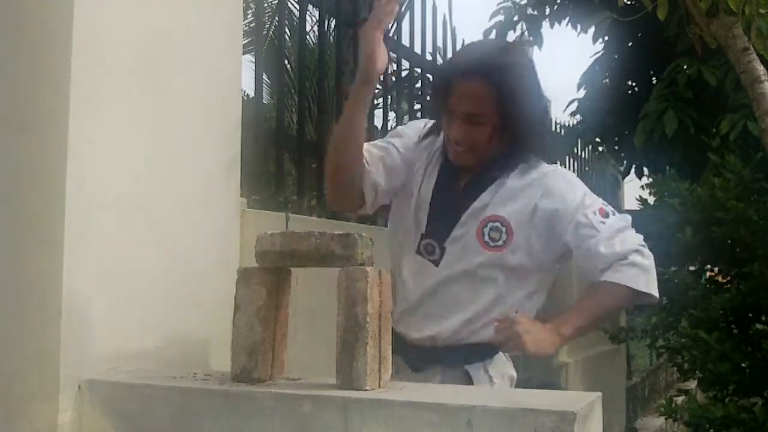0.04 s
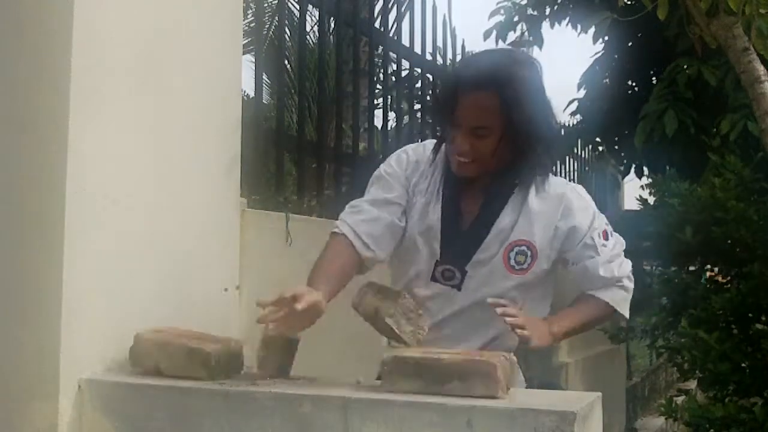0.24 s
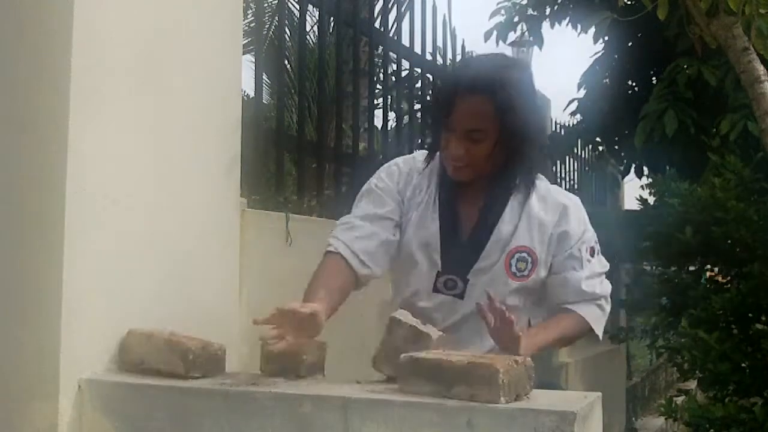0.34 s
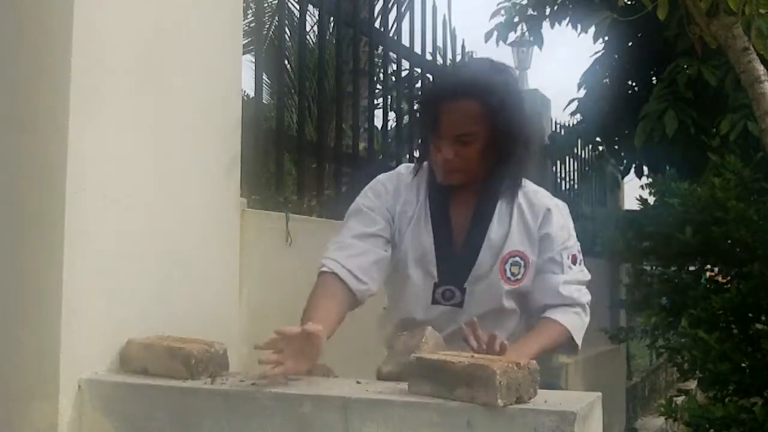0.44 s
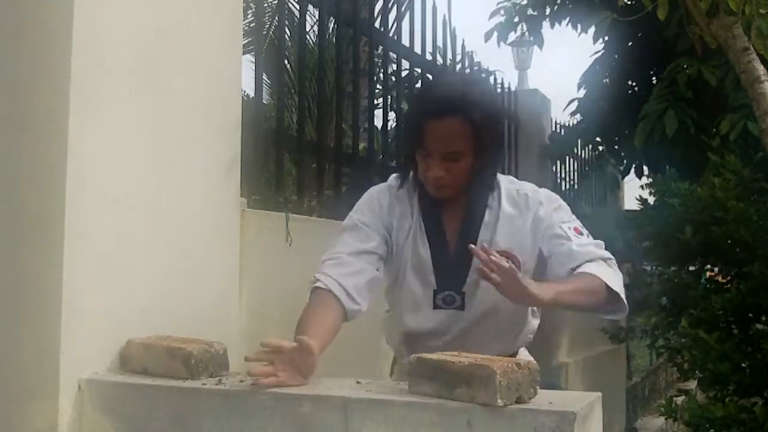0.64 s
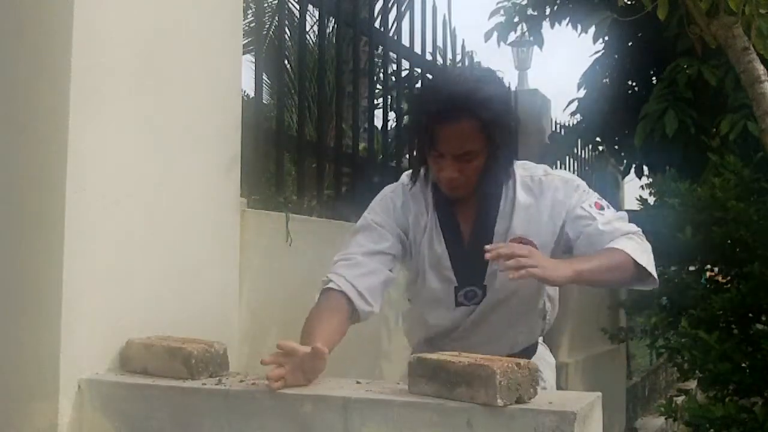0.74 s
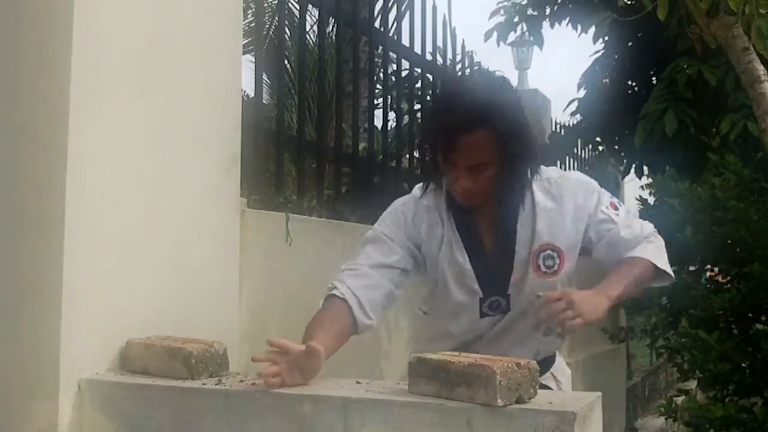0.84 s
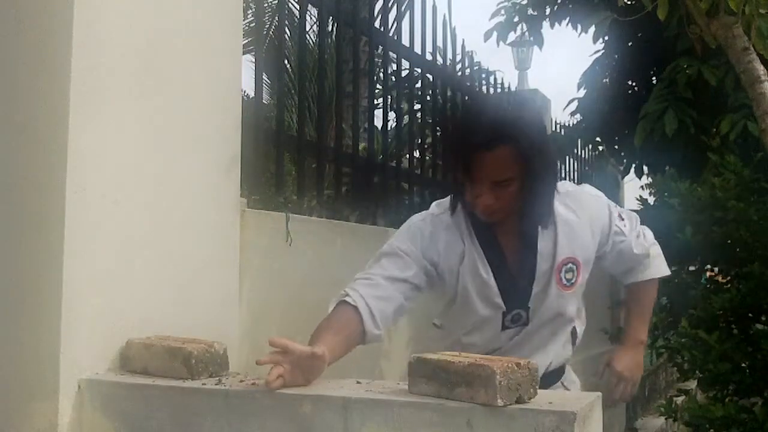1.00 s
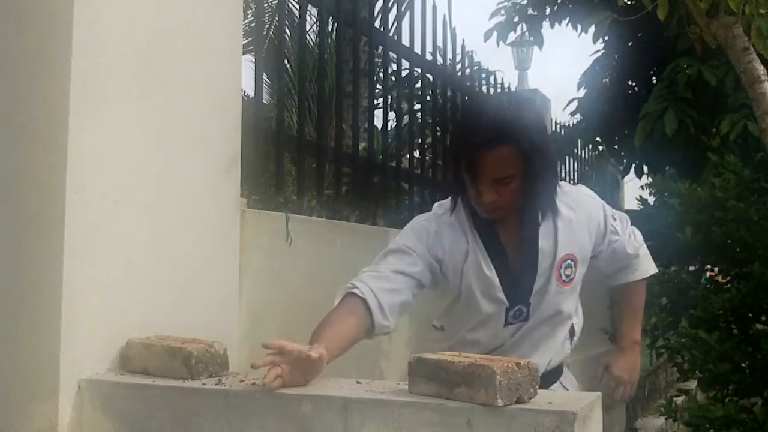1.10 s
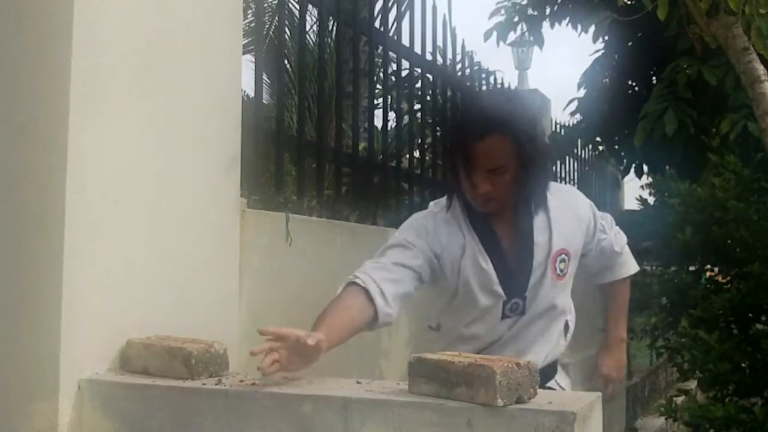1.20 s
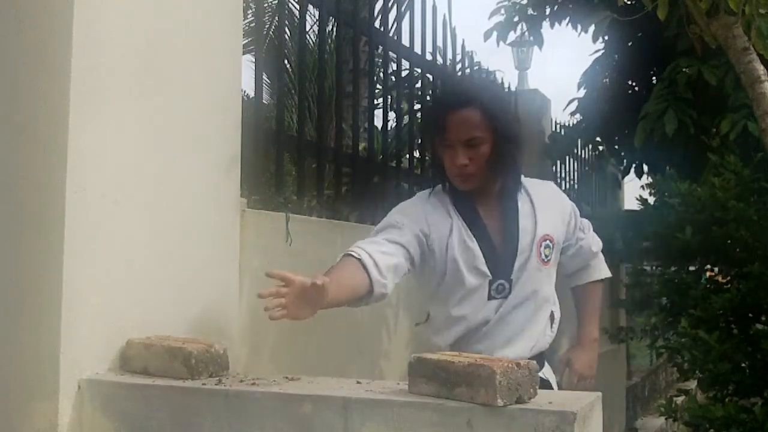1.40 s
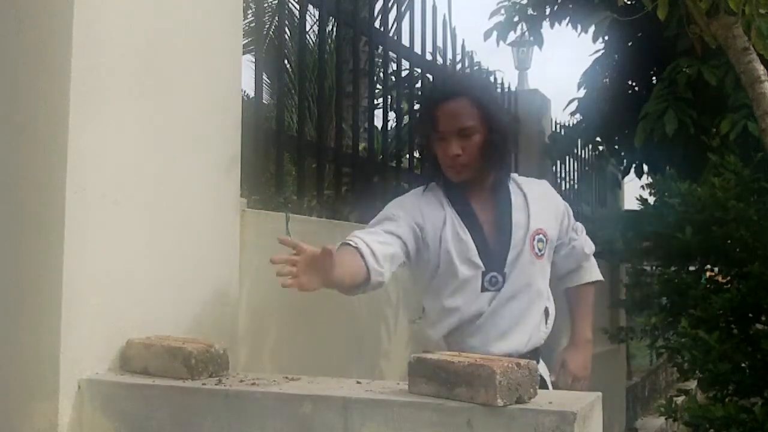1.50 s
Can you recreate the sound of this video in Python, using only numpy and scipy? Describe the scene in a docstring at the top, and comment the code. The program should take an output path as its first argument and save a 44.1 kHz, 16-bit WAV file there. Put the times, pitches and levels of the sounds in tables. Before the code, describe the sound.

A hand chops through a brick with a sharp crack, pieces clattering and tumbling down outdoors

```python
"""Brick chopped in half outdoors

A hand chops through a brick laid across two upright bricks on a ledge: noise bursts over damped low modes.
Pieces clink and one brick slams flat, as ringing modes that overload the microphone; sparse grains make grit.
Pieces thud and tumble on the ground as coloured bursts, one setting metal ringing; cloth rustles in swelling noise.
Thin chirps sound faintly, and nearby walls answer by convolution over a noise bed of low rumble and still air."""
import sys
import numpy as np
from scipy import signal
from scipy.fft import rfft, irfft, next_fast_len
from scipy.io import wavfile
from scipy.ndimage import uniform_filter1d

SR = 44100
rng = np.random.default_rng(int(sys.argv[2]) if len(sys.argv) > 2 else 0)


def persist_wave(psi):
    """Save psi, clipped to +-1, as 16-bit WAV."""
    counts = np.round(np.clip(psi, -1, 1) * 32767).astype(np.int16)
    wavfile.write(sys.argv[1], SR, np.atleast_2d(counts).T)


N = 68355  # samples in the scene
T = np.arange(SR // 2) / SR  # clock of one event, seconds
SCENE_T = np.arange(N) / SR  # clock of the whole scene, seconds


def amp(db):
    """Decibels to gain."""
    return 10 ** (np.asarray(db) / 20)


def unit(x):
    """Scale to rms 1."""
    return x / np.sqrt(np.mean(x ** 2) + 1e-20)


def along(points, hz):
    """Read (Hz, value) points at any frequency, on a log axis."""
    f, v = np.transpose(points)
    return np.interp(np.log(hz + 1), np.log(f + 1), v)


def fader(points):
    """Gain over the scene from (s, dB) points."""
    return amp(np.interp(SCENE_T, *np.transpose(points)))


def noise(size):
    """White noise."""
    return rng.standard_normal(size)


def coloured(x, colour):
    """Shape x with a spectrum, at rms 1."""
    gain = amp(along(colour, np.fft.rfftfreq(len(x), 1 / SR)))
    return unit(irfft(rfft(x) * gain, len(x)))


def add(out, s, x):
    """Mix x into out at time s."""
    i = max(0, round(s * SR))
    out[i:i + len(x)] += x[:max(0, len(out) - i)]


def burst(colour, attack, t60):
    """The noise of one contact: a quick rise and a decay (seconds), with the same energy on every draw."""
    shape = (1 - np.exp(-T / attack)) * amp(-60 * T / t60)
    x = shape * coloured(noise(len(T)), colour)
    return x * np.linalg.norm(shape) / np.linalg.norm(x)


def ring(modes, attack, blur):
    """Damped modes whose phases drift (blur in radians per root second), as in a rough body."""
    drifts = blur * np.cumsum(noise((len(modes), len(T))), axis=1) / np.sqrt(SR)
    tones = np.zeros(len(T))
    for (hz, db, t60), drift in zip(modes, drifts):
        decay = amp(db + rng.normal() - 60 * T / t60)  # each strike weights the modes a little differently
        tones += decay * np.sin(2 * np.pi * hz * T + drift)
    return tones * (1 - np.exp(-T / attack))


# stone contacts on the ledge: start_s, thud_db, knock_db, crack_db, length_factor
STONE_BLOWS = [(0.1442, -5, -17.5, -10.5, 0.96), (.1867, -25.5, -28.5, -20.5, 1.4),
               (0.235, -33, -52.5, -33, 1.3), (0.2697, -27, -37.5, -28, 1.6), (0.2733, -23, -33.5, -29, 1),
               (0.3199, -10, -6.5, -7.5, 0.96), (.3345, -12, -0.5, -17, 0.65),
               (0.3411, -10.5, -9.5, -15, 0.56), (0.404, -30, -41, -25, 0.32),
               (0.4181, -23, -31, -25.5, 1.48), (.431, -26.5, -26.5, -40, 0.63),
               (0.4407, -19, -15.5, -41.5, 0.42), (0.4624, -20, -24.5, -22.5, .45),
               (0.4772, -24.5, -38, -25.5, 0.71), (0.4985, -27.5, -46, -34.5, 1.02),
               (0.5206, -33.5, -36.5, -46, 0.68)]
# the ledge's low ring: pitch_hz, level_db, t60_s
LEDGE_MODES = [(101.5, -11, 0.47), (224, -13.5, .06), (288, 1, 0.066), (357.7, 2, 0.057)]
# spectrum of the ledge's thump: frequency_hz, level_db
THUD_COLOUR = [(25, -38), (50, -21), (100, -15), (200, 11), (340, -2), (520, -12), (1000, -45.5),
               (2500, -63.5)]
# spectrum of the brick's knock: frequency_hz, level_db
KNOCK_COLOUR = [(150, -20.5), (400, -2.5), (550, -9), (730, 3), (1000, -9), (1400, -10.5), (1800, -22.5),
                (2600, -12.5), (5000, -49.5), (12000, -59.5)]
# bright spectrum of cracking brick, shared with the grit: frequency_hz, level_db
CRACK_COLOUR = [(600, -27.5), (1250, 14), (1750, -8.5), (2250, 4.5), (2900, 3), (4300, -1.5), (6500, 2.5),
                (10000, -3.5), (13000, -9), (16000, -17.5)]


def blows():
    """Every contact cracks, knocks the brick and thumps the ledge into a short low ring."""
    out = np.zeros(N)
    for s, thud_db, knock_db, crack_db, length in STONE_BLOWS:
        thump = amp(-4) * burst(THUD_COLOUR, attack=0.001, t60=0.05 * length)
        thump = thump + amp(-6.5) * ring(LEDGE_MODES, attack=0.0005, blur=6.9)
        knock = burst(KNOCK_COLOUR, attack=0.00067, t60=0.063 * length)
        crack = burst(CRACK_COLOUR, attack=0.00042, t60=0.031 * length)
        add(out, s, amp(thud_db) * thump + amp(knock_db) * knock + amp(crack_db) * crack)
    return out


# a whole brick landing hard enough to ring: start_s, level_db
BRICK_SLAMS = [(.3005, -32), (.3192, 2.5), (.329, -13.5), (0.8547, -24), (.88, -30.5), (1.541, -39)]
# the whole brick's modes: pitch_hz, level_db, t60_s
BRICK_MODES = [(394, -19, .08), (484, -17.5, 0.11), (646, -11.5, .08), (711, -16, 0.059),
               (786.7, -8.5, 0.11), (992, -20.5, 0.14), (1166, -8, 0.076), (1349.5, 3.5, 0.041),
               (1513, -19, 0.04), (1548, -12.5, 0.044)]


def slams():
    """A whole brick lands flat and rings in its low, quickly damped modes."""
    out = np.zeros(N)
    for s, db in BRICK_SLAMS:
        add(out, s, amp(db) * ring(BRICK_MODES, attack=0.00043, blur=9.2))
    return out


# brick pieces ringing against each other: start_s, level_db, pitch_hz, overtone_db
PIECE_CLINKS = [(0.1876, -9.5, 3133, -9), (0.24, -44.5, 3110, 9.5), (0.2722, -10.5, 2776, -34),
                (0.271, -19, 3270, -18.5), (0.319, 1.5, 3073, -26), (0.327, -5.5, 3856, -33),
                (0.326, -9, 2940, -23.5), (0.341, -14.5, 2580, -22.5), (0.348, -9.5, 3180, -22.5),
                (.427, -27.5, 3170, -16), (.464, -30.5, 2700, -9), (0.4772, -20, 3113, -13)]
OVERTONE_RATIO, CLINK_T60_S = 1.651, 0.04


def clinks():
    """Small pieces ring high, each with one inharmonic overtone."""
    out = np.zeros(N)
    for s, db, hz, overtone_db in PIECE_CLINKS:
        modes = [(hz, 0, CLINK_T60_S), (hz * OVERTONE_RATIO, overtone_db, CLINK_T60_S)]
        add(out, s, amp(db) * ring(modes, attack=0.0004, blur=13))
    return out


# pieces landing and tumbling on the ground: start_s, thud_db, knock_db, dirt_db, length_factor, pitch_hz
GROUND_LANDINGS = [(.8525, -19.5, -18, -34, 1.13, 683), (.885, -28.5, -34, -47.5, 2, 750),
                   (0.9952, -17.5, -14.5, -30.5, 0.67, 485), (1.008, -45.5, -26, -39, 1.73, 426),
                   (1.021, -23.5, -48, -57, 1.27, 495), (1.092, -32.5, -34, -56.5, .7, 422),
                   (1.1741, -36.5, -35, -60, 0.93, 560), (1.224, -31, -33.5, -50, 0.94, 690),
                   (1.2643, -29.5, -25.5, -69, 0.88, 460), (1.271, -31.5, -25.5, -76, 1.33, 430),
                   (1.296, -27, -23.5, -63, 1.05, 371), (1.319, -27.5, -32, -55, 1.58, 330),
                   (1.541, -28.5, -34, -47.5, 1.3, 700)]
# spectrum of a landing knock: ratio_to_pitch, level_db
LANDING_KNOCK_COLOUR = [(.25, -56), (.6, -6), (.87, 1), (1.1, -1.5), (1.4, -14), (1.9, -12), (2.4, -24.5),
                        (3.5, -28), (6, -73), (20, -85)]
# dull spectrum of the ground: frequency_hz, level_db
EARTH_COLOUR = [(25, -36), (45, -40), (70, 2.5), (135, -0.5), (220, -2), (330, -23), (600, -28),
                (1200, -23), (3000, -66.5)]
# bright spectrum of sprayed dirt: frequency_hz, level_db
DIRT_COLOUR = [(600, 4), (1700, -1.5), (3200, 2.5), (5500, -2.5), (9500, -3), (12500, -8), (16000, -20.5)]
# narrower spectrum of the crunch in the dirt: frequency_hz, level_db
CRUNCH_COLOUR = [(800, -30), (2000, 0), (3500, 4), (5200, 0.5), (6500, -28), (16000, -30)]


def landings():
    """Soft ground gives a dull thud and a knock at the piece's own pitch, then a short spray of dirt."""
    out = np.zeros(N)
    for s, thud_db, knock_db, dirt_db, length, hz in GROUND_LANDINGS:
        knock_colour = [(hz * ratio, db) for ratio, db in LANDING_KNOCK_COLOUR]
        knock = burst(knock_colour, attack=0.0032, t60=0.068 * length)
        thud = burst(EARTH_COLOUR, attack=0.00529, t60=0.12 * length)
        spray = burst(DIRT_COLOUR, attack=0.0006, t60=0.19 * length)
        crunch = amp(7.5) * burst(CRUNCH_COLOUR, attack=0.0016, t60=0.018)
        add(out, s, amp(thud_db) * thud + amp(knock_db) * knock)
        add(out, s + 0.0045, amp(dirt_db) * (spray + crunch))
    return out


# contacts that set the metal ringing: start_s, level_db
METAL_CONTACTS = [(0.854, -23.5), (0.876, -35), (.893, -30), (.913, -45.5)]
# the metal's modes: pitch_hz, level_db, t60_s
METAL_MODES = [(6100, -9.5, 0.15), (6200, -13.5, .1), (8010, -5.5, 0.12), (7970, -5, .09),
               (8220, -12, 0.0725), (9900, -13, 0.144), (9930, -16.5, 0.094), (10200, -8, 0.045),
               (12140, -20.5, .09)]


def metal():
    """A falling piece sets light metal jingling in high modes, some close enough to beat."""
    out = np.zeros(N)
    for s, db in METAL_CONTACTS:
        add(out, s, amp(db) * ring(METAL_MODES, attack=0.001, blur=18))
    return out


# level of the scattering grit: time_s, level_db
GRIT_LEVEL = [(.14, -78), (.16, -31), (.22, -48.5), (.3, -44), (.35, -43), (.42, -41), (.5, -49.5),
              (.56, -63.5), (.7, -76)]
GRAINS_PER_S = 1000


def grit():
    """Crumbs of brick patter on the ledge as random sparse impulses with the crack's colour."""
    lands = rng.random(N) < GRAINS_PER_S / SR
    return coloured(lands * noise(N), CRACK_COLOUR) * fader(GRIT_LEVEL)


def swells(rows, colour, rough_db):
    """Noise that swells and fades around each time, its level fluttering by rough_db rms."""
    level = sum(amp(db) * np.exp(-((SCENE_T - s) / half) ** 2) for s, half, db in rows)
    flutter = amp(rough_db * unit(uniform_filter1d(noise(N), size=200)))
    return level * unit(flutter * coloured(noise(N), colour))


# a hand brushing the gritty ledge: centre_s, half_length_s, level_db
HAND_SWISHES = [(.738, 0.024, -43)]
# spectrum of the brushing: frequency_hz, level_db
SWISH_COLOUR = [(1000, -20), (1900, -10), (2900, 6.5), (3700, 2), (5000, -14), (12000, -31)]


def swishes():
    """Skin dragged over grit gives a rough swell of noise."""
    return swells(HAND_SWISHES, SWISH_COLOUR, rough_db=6.5)


# sleeve movements: centre_s, half_length_s, level_db
SLEEVE_RUSTLES = [(.735, 0.026, -50), (.81, 0.067, -50.5), (1.315, 0.027, -46), (1.37, 0.031, -53)]
# spectrum of rubbing cloth: frequency_hz, level_db
CLOTH_COLOUR = [(1000, -14), (3000, -1.5), (4500, -14), (7000, 7), (8500, -9), (10000, 2.5), (13000, -13),
                (16000, -15)]


def rustles():
    """Cloth rubs on itself in soft, treble-heavy swells of noise."""
    return swells(SLEEVE_RUSTLES, CLOTH_COLOUR, rough_db=3)


# faint thin chirps: start_s, length_s, pitch_hz, level_db
FAINT_CHIRPS = [(0.0, 0.027, 2410, -51), (0.049, 0.044, 2432, -50.5), (0.705, .028, 5890, -42),
                (.72, 0.063, 3480, -42.5), (.727, 0.016, 3000, -40.5), (1.37, 0.053, 2786, -53),
                (1.382, .06, 3655, -58), (1.45, 0.12, 3704, -48.5)]


def chirps(blur=15):
    """Thin, slightly unsteady high tones that swell and fade, from sines with drifting phase."""
    out = np.zeros(N)
    for s, length, hz, db in FAINT_CHIRPS:
        drift = blur * np.cumsum(noise(len(T))) / np.sqrt(SR)
        swell = np.sqrt(np.abs(np.sin(np.pi * np.minimum(T / length, 1))))
        add(out, s, amp(db) * swell * np.sin(2 * np.pi * hz * T + drift))
    return out


# decay of the walls' answer: frequency_hz, t60_s
WALL_DECAY = [(80, .45), (400, 0.48), (1300, .4), (3200, 0.66), (7000, 0.77), (15000, 0.5)]
WALLS_DB, EARLY_DB = -20, -17  # diffuse tail, early reflections


def walls(x, first_s=0.005, spread_s=0.041):
    """Nearby walls return nine early reflections and a diffuse tail that decays per frequency."""
    hz, t, z = signal.stft(noise(len(T)), SR, nperseg=256)
    decay = amp(-60 * t / along(WALL_DECAY, hz)[:, None])
    tail = signal.istft(z * decay, SR, nperseg=256)[1][:len(T)]
    tail = tail * (1 - np.exp(-T / 0.008))  # the tail builds up gently
    delays = (SR * (first_s + spread_s * rng.random(size=9))).astype(int)
    early = np.bincount(delays, noise(9), len(T))
    response = amp(WALLS_DB) * tail / np.linalg.norm(tail) + amp(EARLY_DB) * early / np.linalg.norm(early)
    return signal.fftconvolve(x, response)[:N]


# spectrum of the low rumble: frequency_hz, level_db
RUMBLE_COLOUR = [(20, -26), (40, -16), (52, -14.5), (67, 3.5), (100, -2.5), (160, -24.5), (400, -46.5)]
# level of the low rumble: time_s, level_db
RUMBLE_FADER = [(0, -48.5), (.1, -52.5), (.2, -36.5), (.24, -51), (.28, -31.5), (.35, -37), (.45, -37.5),
                (.6, -42.5), (.7, -47.5), (.77, -55), (.85, -49), (.92, -41.5), (1.0, -43), (1.2, -54.5),
                (1.35, -44), (1.55, -50)]


def rumble(evenness=0.6):
    """Low noise with its own swings partly evened out, then swelling and sinking."""
    low = coloured(noise(N), RUMBLE_COLOUR)
    power = np.abs(uniform_filter1d(low ** 2, size=2200)) + 1e-6
    return unit(low / power ** (evenness / 2)) * fader(RUMBLE_FADER)


# spectrum of the still air: frequency_hz, level_db
AIR_COLOUR = [(150, -1.5), (300, 1.5), (600, -8.5), (1300, -11), (1900, -16.5), (3200, -11), (5000, -13.5),
              (10000, -17), (16000, -31.5)]
AIR_DB = -52


def still_air():
    """Steady, quiet outdoor noise."""
    return amp(AIR_DB) * coloured(noise(N), AIR_COLOUR)


def scene():
    """Everything reaches one microphone, alike in both channels."""
    direct = blows() + slams() + clinks() + landings() + metal() + grit()
    direct = direct + swishes() + rustles() + chirps()
    return np.tile(direct + walls(direct) + rumble() + still_air(), (2, 1))


# spectrum of the recorder's hiss: frequency_hz, level_db
HISS_COLOUR = [(100, 4), (2000, -4.5), (5000, -6), (10000, -0.5), (15000, 4)]
HISS_DB, TOP_HZ = -59, 16100  # hiss level, treble cutoff


def record(dry, top=1.0):
    """The recorder hisses faintly, bends peaks over at full scale and cuts the highest treble."""
    hiss = np.array([coloured(noise(N), HISS_COLOUR) for _ in dry])
    x = dry + amp(HISS_DB) * hiss
    x = x / (1 + np.abs(x / top) ** 8) ** (1 / 8)  # nearly hard clipping
    m = next_fast_len(N + SR // 2)
    passband = np.fft.rfftfreq(m, 1 / SR) < TOP_HZ
    return irfft(rfft(x, m) * passband, m)[:, :N]


dry = scene()
out = record(dry)
persist_wave(out)
```